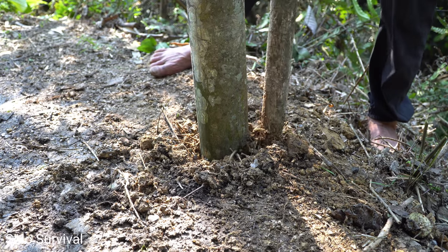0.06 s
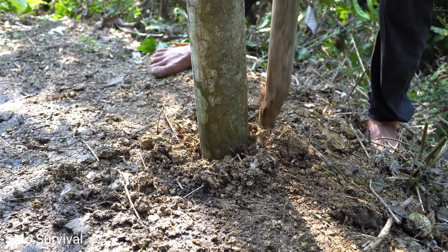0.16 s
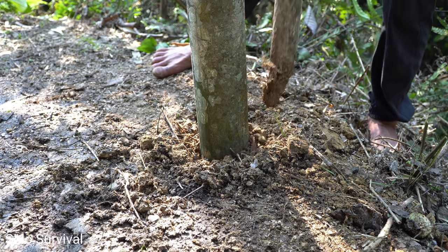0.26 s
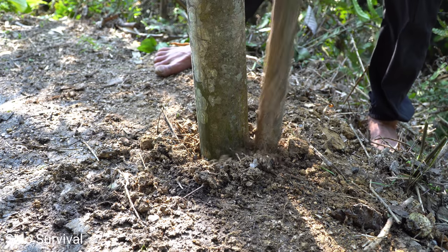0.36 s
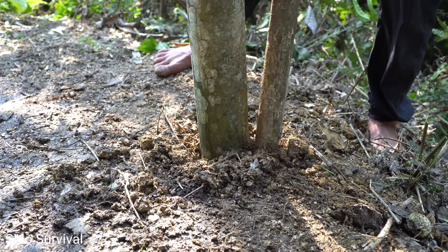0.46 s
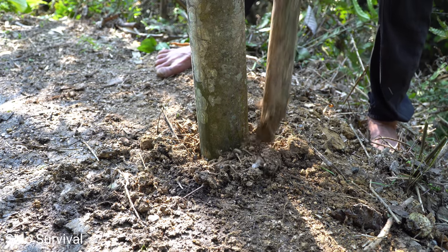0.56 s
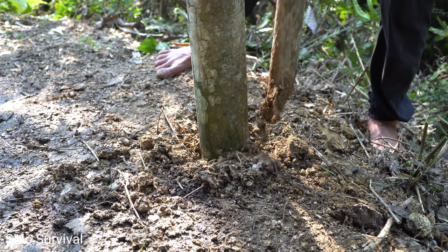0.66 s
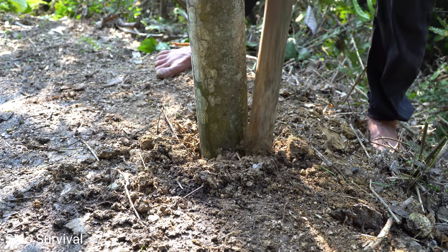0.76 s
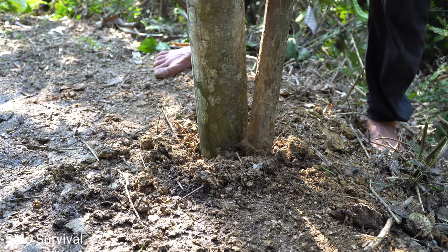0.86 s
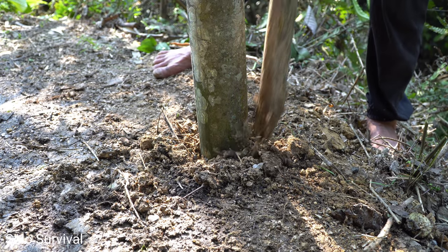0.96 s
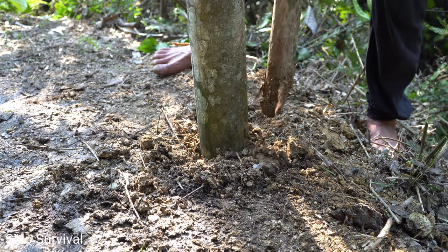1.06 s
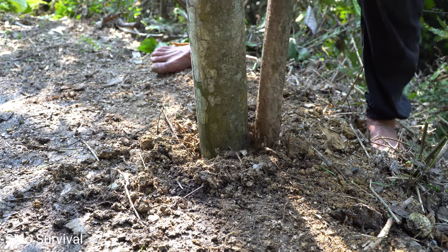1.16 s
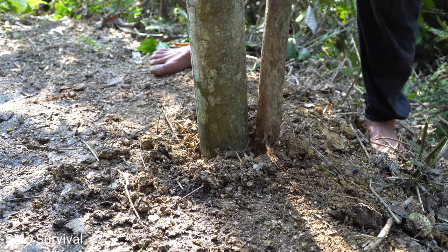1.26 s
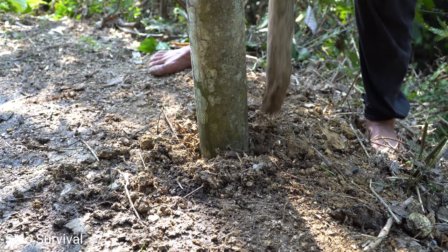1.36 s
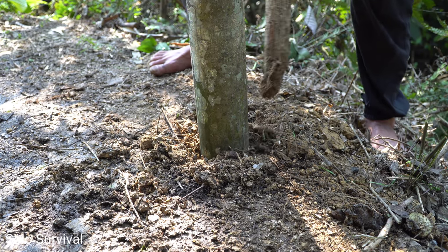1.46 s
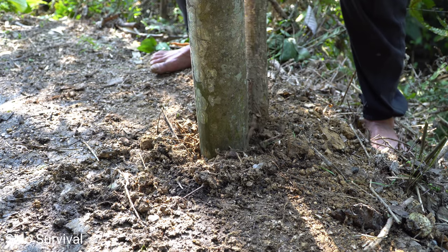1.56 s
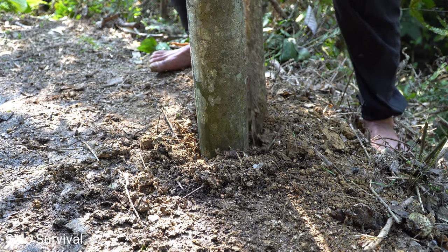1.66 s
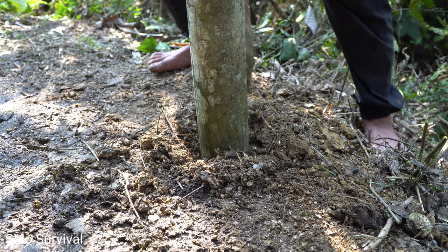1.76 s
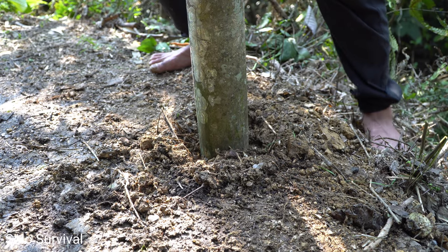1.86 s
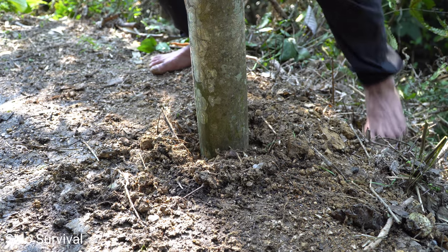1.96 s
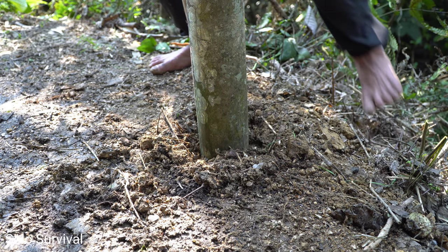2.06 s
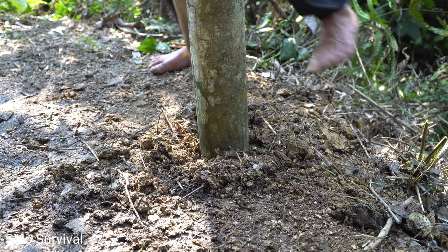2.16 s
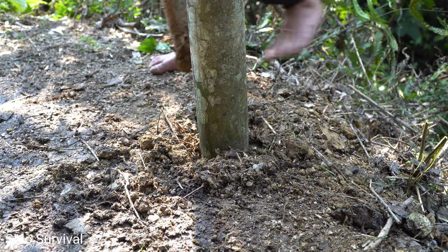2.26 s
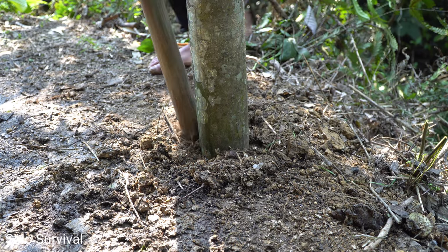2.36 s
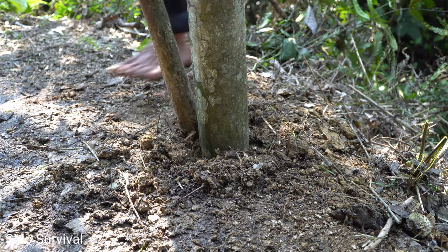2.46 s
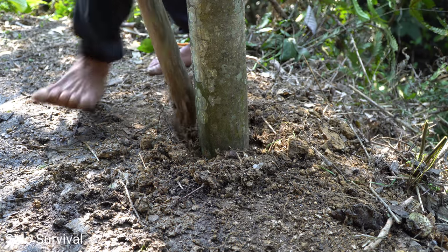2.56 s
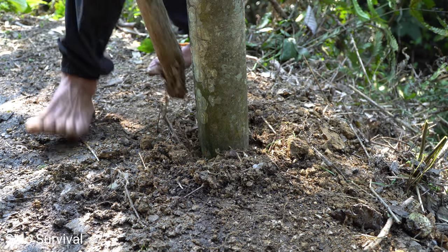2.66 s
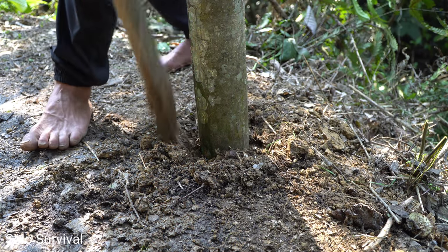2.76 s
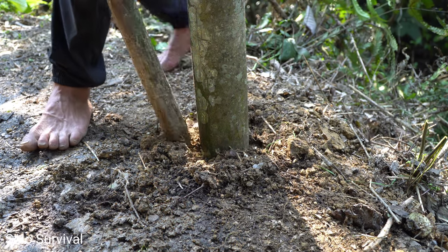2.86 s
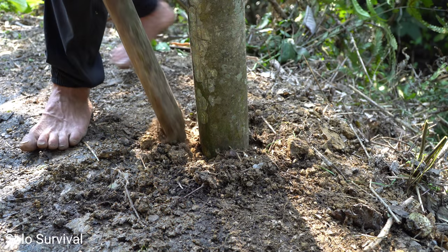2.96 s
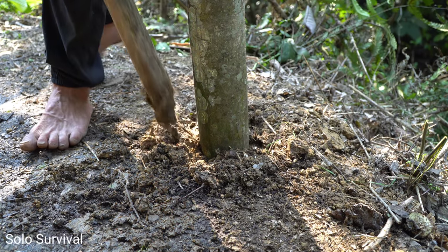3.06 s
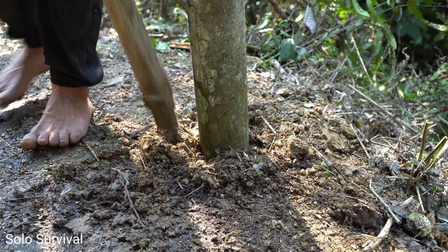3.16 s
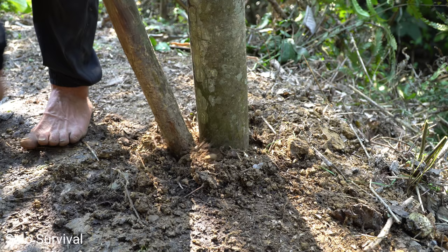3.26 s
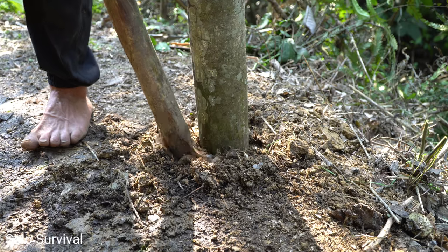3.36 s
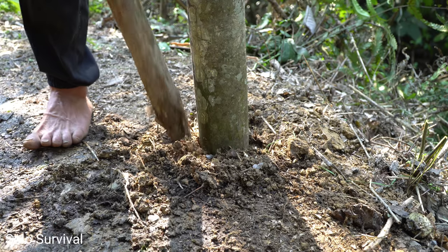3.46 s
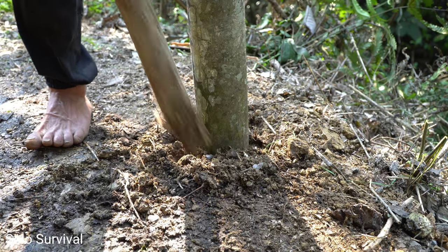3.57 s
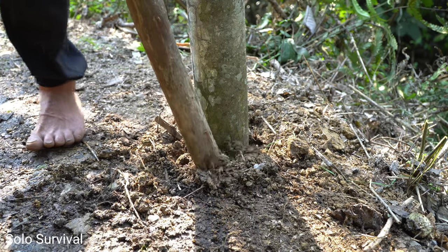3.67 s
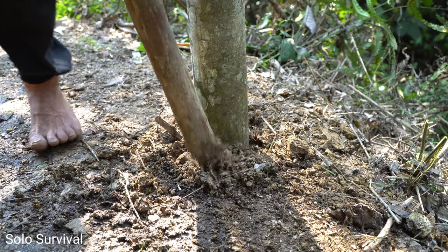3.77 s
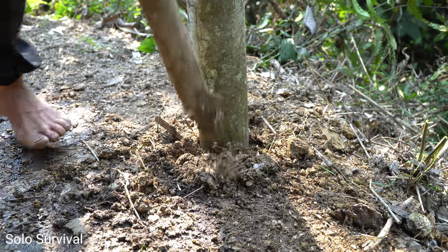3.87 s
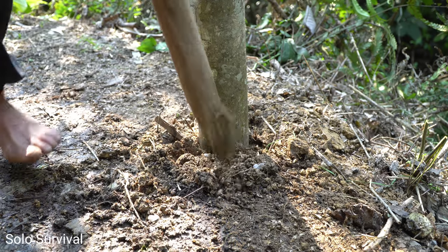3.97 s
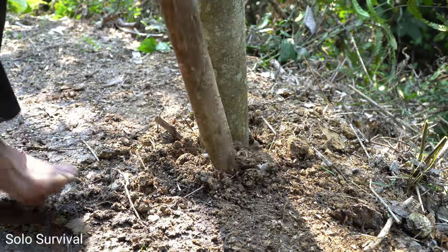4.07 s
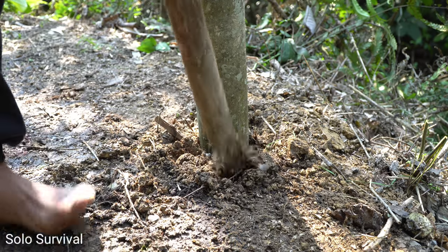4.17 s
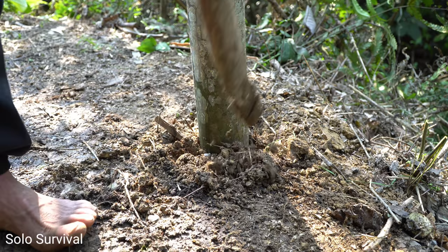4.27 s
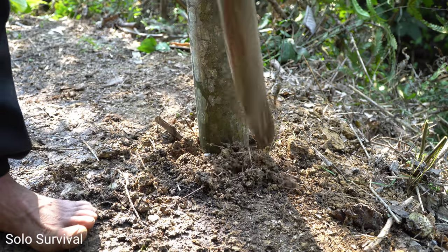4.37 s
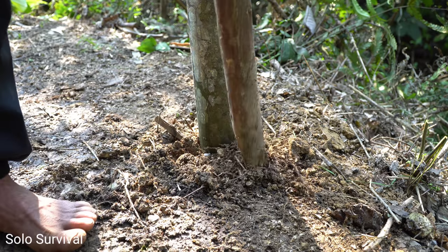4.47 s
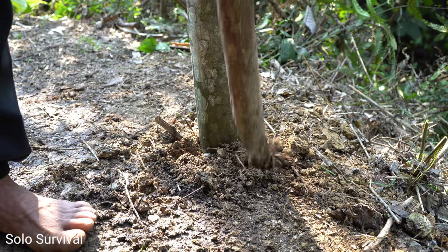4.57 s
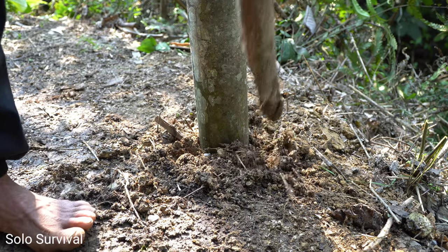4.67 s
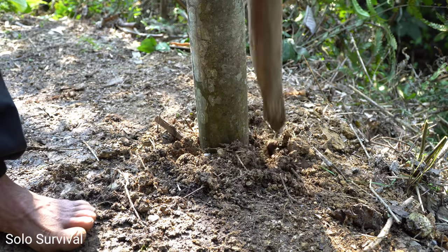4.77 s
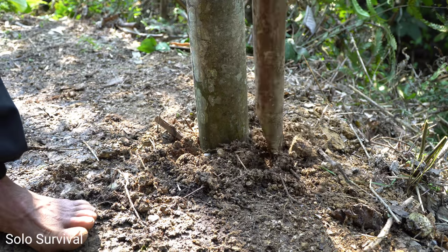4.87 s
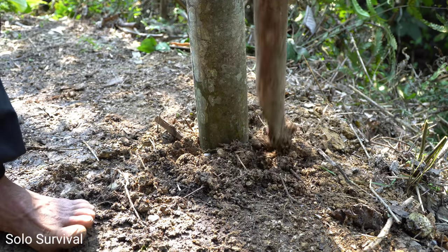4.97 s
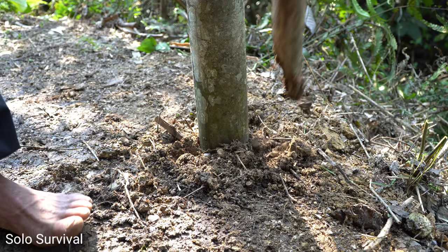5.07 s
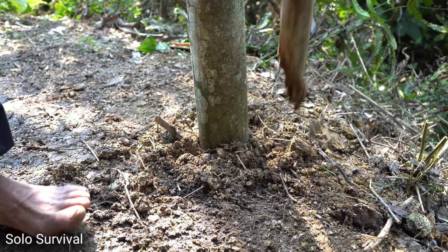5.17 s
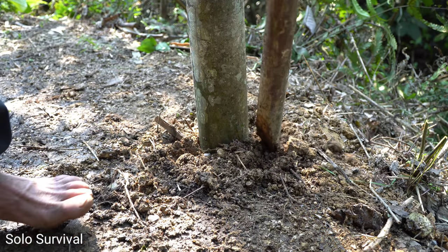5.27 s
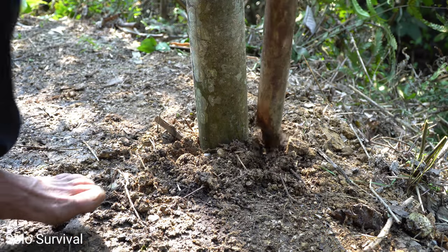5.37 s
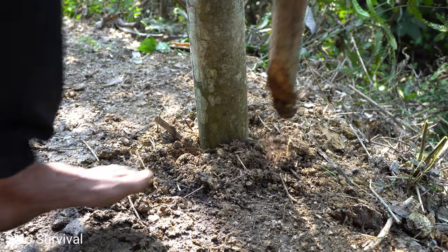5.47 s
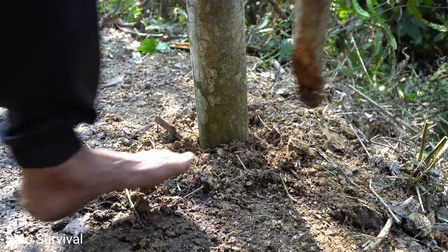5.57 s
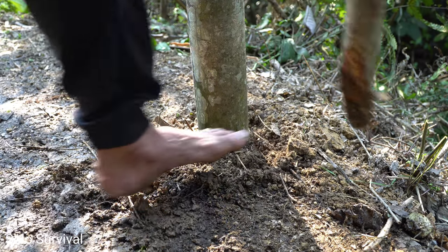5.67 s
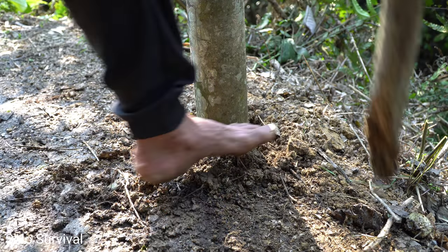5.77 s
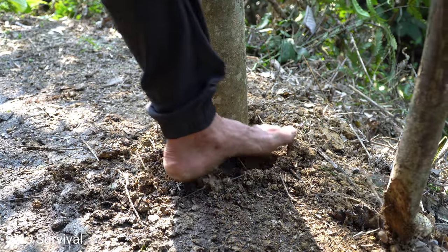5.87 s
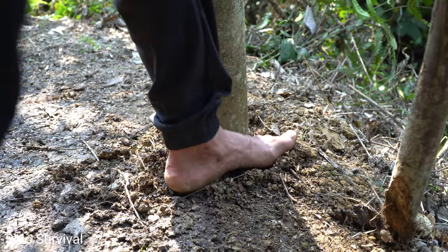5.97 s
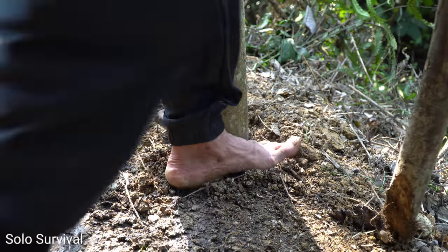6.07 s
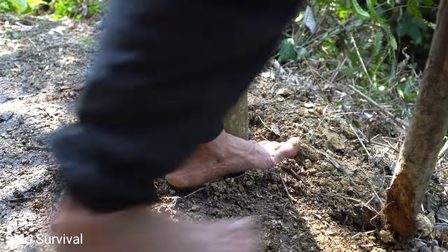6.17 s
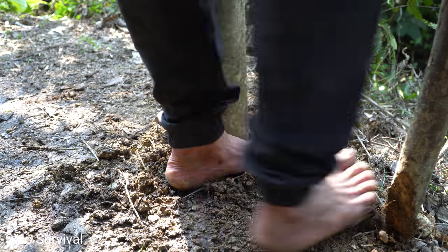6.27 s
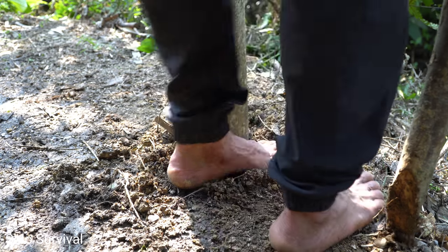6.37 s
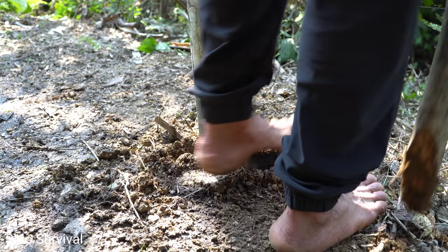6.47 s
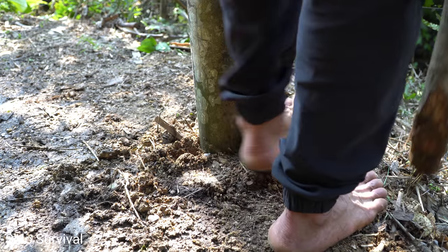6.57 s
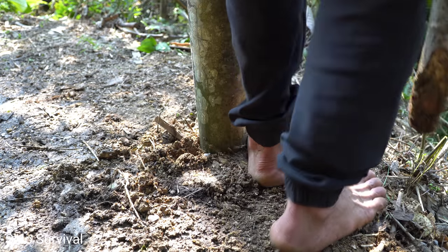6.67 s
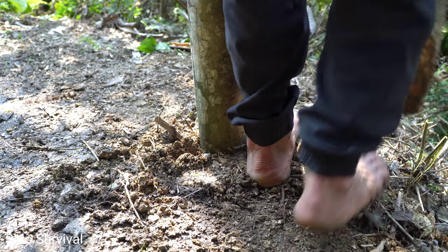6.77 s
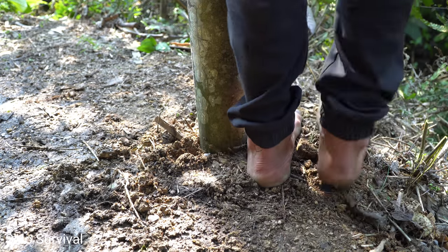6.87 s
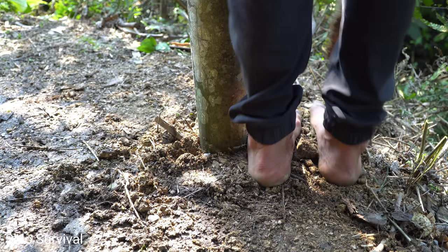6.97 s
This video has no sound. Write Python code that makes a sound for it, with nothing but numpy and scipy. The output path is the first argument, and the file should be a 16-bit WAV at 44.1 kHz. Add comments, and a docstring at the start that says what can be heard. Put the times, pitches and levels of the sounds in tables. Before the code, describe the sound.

Close stereo microphone near the ground: dry, gritty strokes of a stick packing soil. The first strokes gradually weaken, a hollow one follows a shifting foot, then brighter, harder crunches continue steadily until the last firm blow. A faint tap, loose earth scuffs and small snaps follow as bare feet step around. Soft forest air, quiet high bird chirps and a slight echo from the trees lie behind.

```python
"""Ramming soil around a post in a forest

A wooden stick rams loose soil, about two and a half blows a second: crushed grains ring its modes,
packed soil sounds hollow, sand hisses, crumbs patter and the ground bounces as the stick stops.
Bare feet scuff the earth and stir litter, as filtered random grains; pebbles and twigs click as short
resonances. A thin far bird call slurs upward, noise makes the forest air, and the trees echo softly."""
import sys
import numpy as np
from scipy import signal
from scipy.fft import rfft, irfft, next_fast_len
from scipy.io import wavfile

SR = 44100
rng = np.random.default_rng(int(sys.argv[2]) if len(sys.argv) > 2 else 0)


def to_wav(s):
    """Save 16-bit WAV."""
    ch = np.atleast_2d(s).T  # columns
    pcm = np.round(np.clip(ch, -1, 1) * 32767)  # PCM
    wavfile.write(sys.argv[1], SR, pcm.astype(np.int16))


N = 310023  # samples


def undb(db):
    """Decibels to gain."""
    return 10 ** (np.asarray(db) / 20)


def unit(x):
    """Scale to rms 1."""
    return x / np.sqrt(np.mean(x ** 2) + 1e-20)


def colour(x, points):
    """Causal minimum-phase filter with the given (Hz, dB) outline."""
    hz, db = np.transpose(points)
    f = np.fft.rfftfreq(2048, 1 / SR) + 1  # +1 keeps the log finite
    cepstrum = irfft(np.log(undb(np.interp(np.log(f), np.log(hz), db))))
    # fold onto positive time
    cepstrum[1:len(f) - 1] *= 2
    cepstrum[len(f):] = 0
    impulse = irfft(np.exp(rfft(cepstrum)))
    return signal.fftconvolve(x, impulse[None], axes=1)[:, :x.shape[1]]


def resonate(x, hz, width_hz):
    """One resonance, gain 1 at its centre."""
    return signal.lfilter(*signal.iirpeak(hz, hz / width_hz, fs=SR), x)


def pair(n, apart):
    """Noise in two channels: a shared part and a part of opposite sign."""
    mid, side = rng.standard_normal((2, n))
    return np.array([mid + apart * side, mid - apart * side])


def grains(n, per_s, spread_db, apart):
    """Random clicks, many small and a few large, each with its own balance."""
    hit = rng.random(n) < per_s / SR
    size = hit * undb(spread_db * np.minimum(rng.exponential(size=n), 4))
    balance = 1 + apart * rng.standard_normal(n) * np.array([[1], [-1]])
    return size * rng.choice([-1, 1], n) * balance


def wobble(n, per_s):
    """Random values, per_s of them a second, joined by straight lines."""
    steps = np.arange(n) / SR * per_s
    knots = np.arange(int(steps[-1]) + 2)
    return np.interp(steps, knots, rng.standard_normal(len(knots)))


def swell(rise_s, fall_s, attack_shape=1.9, release_shape=1.45):
    """Contact pressure that builds quickly and lets go; its peak comes three rise times in."""
    t = np.arange(-3 * rise_s, 4 * fall_s + .02, 1 / SR)
    attack = np.abs(t / rise_s) ** attack_shape
    release = np.abs(t / fall_s) ** release_shape
    return np.exp(-np.where(t < 0, attack, release))


def burst(x, press, db):
    """Scale a burst so that its rms at full pressure is db."""
    return unit(x) * np.sqrt(np.mean(press ** 2)) * undb(db)


def add(out, s, x, pan_db, lead_s_per_db=1.5e-5, lead_top_hz=4000):
    """Place a sound at time s; the nearer channel is louder and, below the treble, a little earlier."""
    side_db = np.array([[pan_db], [-pan_db]]) / 2
    margin = 64  # samples of room for the lead
    n = next_fast_len(x.shape[-1] + 2 * margin)
    f = np.fft.rfftfreq(n, 1 / SR)
    cycles = np.minimum(f, lead_top_hz) * side_db * lead_s_per_db - f * margin / SR
    x = irfft(rfft(x, n) * np.exp(2j * np.pi * cycles), n) * undb(side_db)
    i = int(s * SR) - margin
    a, b = max(i, 0), min(i + n, N)
    out[:, a:b] += x[:, a - i:b - i]


# Spectrum of the forest air. Each row: frequency in Hz, level in dB.
AIR_SPECTRUM = [(25, -5), (60, 1), (110, 1.5), (200, -1), (400, -4), (800, -7), (1600, -6.5), (2500, -7.5),
                (4000, -11.5), (7000, -16), (10000, -17), (15500, -21.5)]
FOREST_DB = -57  # rms before the sway


def forest(sway_db=.8):
    """Quiet air in the leaves as filtered noise, swelling slowly; the bass is alike in both channels."""
    side = colour(rng.standard_normal((1, N)), [(60, -22), (300, -10), (1500, -5), (6000, -2)])
    air = colour(rng.standard_normal((1, N)) + side * np.array([[1], [-1]]), AIR_SPECTRUM)
    sway = np.interp(np.arange(N), np.linspace(0, N, 20), rng.standard_normal(20))
    return unit(air) * undb(FOREST_DB + sway_db * sway)


# Spectrum scattered back by the trees. Each row: frequency in Hz, level in dB.
ECHO_SPECTRUM = [(100, -3), (400, 0), (800, -4), (1400, -1), (2200, -2), (4000, 0), (7000, -6),
                 (15000, -11)]


def echo(x, wet_db=-26, t60_s=.85, early_db=9, early_t60_s=.22, build_s=.012):
    """Trunks and leaves scatter the sound back: decaying noise, a strong early part and a longer tail."""
    t = np.arange(SR) / SR
    decay = undb(-60 * t / t60_s) + undb(early_db - 60 * t / early_t60_s)
    response = colour(pair(SR, .6) * decay * (1 - np.exp(-t / build_s)), ECHO_SPECTRUM)
    return signal.fftconvolve(x, unit(response) / np.sqrt(SR), axes=1)[:, :N] * undb(wet_db)


# Far bird calls. Each row: time in seconds, relative level in dB.
BIRD_CALLS = [(-.04, -59), (.6, -54), (1.24, -56), (2.37, -52), (3.52, -53), (4.39, -54), (4.95, -55),
              (6.44, -53)]


def bird(start_hz=4900, top_hz=6920, glide_s=.02, length_s=.065, t60_s=.75, direct_db=26, gain_db=2,
         trill_hz=650, trill_rate_hz=170):
    """A thin upward slur, buzzy at first and pure as it levels off, smeared by the trees."""
    out, t = np.zeros((2, N)), np.arange(SR // 2) / SR
    for s, db in BIRD_CALLS:
        slur = np.exp(-t / glide_s)
        trill = trill_hz * np.sqrt(slur) * np.sin(2 * np.pi * trill_rate_hz * t)
        hz = top_hz + (start_hz - top_hz) * slur + trill
        envelope = np.sqrt(np.abs(np.sin(np.pi * np.minimum(t / length_s, 1))))
        call = np.sin(2 * np.pi * np.cumsum(hz) / SR) * envelope
        trees = pair(len(t), .7) * undb(-60 * t / t60_s)
        trees[:, 0] += undb(direct_db)
        x = signal.fftconvolve(trees, call[None], axes=1)
        add(out, s - .01, x / np.abs(x).max() * 2 * undb(db + gain_db), 0)
    return out


# Dry litter stirring as the worker shifts weight. Each row: time in seconds, level in dB.
LITTER_LEVEL = [(0, -63), (1.55, -66), (1.98, -53), (2.3, -67), (2.65, -59), (3.5, -56), (3.85, -57),
                (4.02, -68), (4.38, -56), (4.78, -66), (5.1, -57), (5.6, -58), (5.85, -65), (6.1, -53),
                (6.3, -50), (6.42, -56), (7.03, -57)]


def litter(per_s=3500, spread_db=3.1, flicker_db=2, flicker_per_s=25):
    """Leaves and crumbs crackle faintly and unevenly under the feet, as filtered grains."""
    t = np.arange(N) / SR
    crackle = colour(grains(N, per_s, spread_db, apart=.45),
                     [(80, -5), (400, -4), (1000, -2), (2200, 0), (4500, -6), (9000, -11), (15000, -19)])
    level_db = np.interp(t, *np.transpose(LITTER_LEVEL))
    return unit(crackle) * undb(level_db + flicker_db * wobble(N, flicker_per_s))


# Pebbles struck and twigs snapping.
# Each row: time in seconds, peak in dB, ring in Hz, left minus right in dB.
SNAPS = [(.0792, -9, 4300, -2), (4.512, -22, 2600, 0), (4.921, -19, 2800, -.5), (5.0135, -28, 12000, 2),
         (5.9712, -14, 3200, -4), (6.2248, -14.5, 4880, 3.5), (6.502, -29, 4900, -3),
         (6.8984, -13, 4850, -4.5)]


def clicks(ring_q=12, crack_db=-15, crack_width_hz=5000, body_hz=1700, body_db=-22, second_s=.0034,
           second_db=-8):
    """A sharp crack with a brief ring, and a weaker second one as the piece gives."""
    out = np.zeros((2, N))
    for s, db, hz, pan_db in SNAPS:
        push = np.zeros(SR // 40)
        push[0], push[int(second_s * SR)] = 1, undb(second_db)
        ring = resonate(push, hz, hz / ring_q)
        crack = undb(crack_db) * resonate(push, hz, crack_width_hz)
        body = undb(body_db) * resonate(push, body_hz, 2 * body_hz)
        x = ring + crack + body
        add(out, s, x / np.abs(x).max() * undb(db), pan_db)
    return out


# Feet and stick scuffing loose earth.
# Each row: peak time in seconds, rise in seconds, rustle in dB, grit in dB, left minus right in dB.
EARTH_SCUFFS = [(1.853, .032, -45, -47, 0), (1.99, .07, -53, -49, 0), (2.592, .018, -41.5, -57, 2),
                (2.645, .012, -50, -55, 2), (2.782, .008, -56, -54, 2), (3.05, .04, -50, -59, 2),
                (3.604, .004, -45, -39, 3), (3.665, .01, -54, -51, 3), (4.29, .004, -62, -49, 1),
                (4.32, .015, -44, -40, 1), (4.401, .003, -47, -40, 1), (5.02, .02, -54, -53, 0),
                (5.412, .015, -51, -50, 0), (5.55, .04, -52, -50, 0), (6.172, .055, -43, -41, 1),
                (6.455, .025, -48, -54, -2), (6.505, .005, -42, -42, -3), (6.805, .045, -46, -51, -2)]
# Spectrum of crumbs and litter sliding. Each row: frequency in Hz, level in dB.
RUSTLE_SPECTRUM = [(60, -6), (200, -4), (400, -7), (900, -4), (1600, 0), (2600, -1), (4200, -6),
                   (8000, -22)]
SCUFF_FALL_S, SCUFF_FALL_PER_RISE = .017, .6  # a slow scuff also dies away slowly


def scuffs(per_s=3500, spread_db=3.4, slip_db=2.5, slip_per_s=70):
    """Crumbs and dry litter slide under soles and stick, catching and slipping as they go."""
    out = np.zeros((2, N))
    for s, rise_s, rustle_db, grit_db, pan_db in EARTH_SCUFFS:
        press = swell(rise_s, SCUFF_FALL_S + SCUFF_FALL_PER_RISE * rise_s, release_shape=1.2)
        slide = press * undb(slip_db * wobble(len(press), slip_per_s))
        rustle = colour(slide * grains(len(press), per_s, spread_db, apart=.25), RUSTLE_SPECTRUM)
        sand = colour(slide * grains(len(press), per_s, spread_db, apart=.45),
                      [(2000, -18), (4500, -1), (9000, 0), (12000, -3), (16000, -6)])
        x = burst(rustle, press, rustle_db) + burst(sand, press, grit_db)
        add(out, s - 3 * rise_s, x, pan_db)
    return out


# The stick works its way round the post.
# Each row: time in seconds, left minus right in dB, bounce of the ground there in Hz.
POST_PATH = [(0, -1.8, 73), (1.3, -1.5, 72), (1.7, -1, 100), (2.05, -.5, 113), (2.9, 1.5, 117),
             (3.7, 2.2, 116), (5.35, -.8, 97), (6, -4, 86)]


def place(s):
    """Left-right balance and ground pitch where the stick works at time s."""
    times, pan_db, ground_hz = np.transpose(POST_PATH)
    return np.interp(s, times, pan_db), np.interp(s, times, ground_hz)


FIRM_DB = -20  # force of an ordinary blow


def crumbs(per_s=2000, spread_db=3.4, rise_s=.012, fall_s=.07, lag_s=.015, level_db=-51.5, per_db=.5):
    """Crumbs thrown up by each blow patter back down, louder after a hard one."""
    out, press = np.zeros((2, N)), swell(rise_s, fall_s)
    for s, _, after, _, force_db, *_ in RAM_BLOWS:
        patter = colour(press * grains(len(press), per_s, spread_db, apart=.4),
                        [(400, -12), (2200, 0), (4500, -1), (8000, -8), (15000, -14)])
        x = burst(patter, press, level_db + per_db * (force_db - FIRM_DB))
        add(out, s + after + lag_s - 3 * rise_s, x, place(s)[0])
    return out


def thumps(t60_s=.07, onset_s=.0015, gain_db=3.6, rumble_db=-33.3, rumble_per_db=.45, rumble_t60_s=.62,
           rumble_hz=76, rumble_width_hz=78, lag_s=.002, bite_db=-3):
    """The ground gives at the bite, bounces a few cycles as the stick stops, then a low rumble dies away."""
    out, t = np.zeros((2, N)), np.arange(SR // 2) / SR
    onset = 1 - np.exp(-t / onset_s)
    for s, _, after, bite, *_, db in RAM_BLOWS:
        bounce = -np.sin(2 * np.pi * place(s)[1] * t) * undb(db - 60 * t / t60_s)
        rumble = resonate(rng.standard_normal(len(t)), rumble_hz, rumble_width_hz)
        rumble = unit(resonate(rumble, rumble_hz, rumble_width_hz))
        rumble = rumble * undb(rumble_db + rumble_per_db * db - 60 * t / rumble_t60_s)
        add(out, s - bite, bounce * undb(bite_db) * onset, 0)
        add(out, s + after + lag_s, (bounce * undb(gain_db) + rumble) * onset, 0)
    return out


# Modes of the hand-held stick. Each row: frequency in Hz, width in Hz, level in dB.
STICK_MODES = [(576, 85, -2), (711, 90, -2), (1060, 140, -3), (1300, 140, -2), (1690, 120, -2),
               (1960, 150, -5), (2190, 170, -1), (2610, 130, 0), (2900, 160, -5), (3190, 120, -4),
               (3510, 200, -2), (4250, 180, -3), (4970, 200, -4)]


def stick(press, per_s=10000, spread_db=2.7, direct_db=-3, drift=.012):
    """Grains crushed under the stick's end ring its modes, which the grip shifts a little each time."""
    crush = press * grains(len(press), per_s, spread_db, apart=.14)
    shift = 1 + drift * rng.standard_normal(len(STICK_MODES))
    x = undb(direct_db) * crush
    for (hz, width_hz, db), k in zip(STICK_MODES, shift):
        x = x + undb(db) * resonate(crush, hz * k, width_hz)
    return x


ENTER_S, STOP_S = .0021, .003  # softness of entry and stop
SETTLE_S = .06  # margin before and after the ploughing
BITE_RISE, BITE_FALL = .8, 1.15  # in bite lengths


def contact(before, after, bite, plough_db):
    """Pressure of one blow: the stick enters, ploughs on evenly, bites hard for a moment and stops."""
    t = np.arange(-before - SETTLE_S, after + SETTLE_S, 1 / SR)
    entered = 1 / (1 + np.exp(-(t + before) / ENTER_S))
    moving = 1 / (1 + np.exp((t - after) / STOP_S))
    peak = np.exp(-(t / (bite * np.where(t < 0, BITE_RISE, BITE_FALL))) ** 2)
    return np.maximum(undb(plough_db) * entered * moving, peak)


# Spectra of crushed grains on wood, packed soil and sand. Each row: frequency in Hz, level in dB.
CRUNCH_SPECTRUM = [(700, -32), (1250, -9), (1700, 1.5), (2500, 0), (3300, -3.5), (4500, -8), (6000, -18),
                   (12000, -45)]
HOLLOW_SPECTRUM = [(250, -18), (410, -14), (530, -2.5), (720, 0), (1050, 0), (1350, -2.5), (2000, -19),
                   (5000, -45)]
GRIT_SPECTRUM = [(2000, -25), (3500, -6), (4900, 0), (6700, -4.5), (9000, -3), (12000, -10), (16000, -14)]
# Blows of the stick. Each row: time of hardest bite in seconds, ploughing before it in seconds,
# ploughing after it in seconds, bite length in seconds, force in dB, wood ring in Hz,
# hollow tone relative to force in dB, hollow ring in Hz, knock in Hz, relative ground thump in dB.
RAM_BLOWS = [ (.087, .0065, .014, .010, -16.3, 2180, -7, 590, 270, -32),
             (.490, .013, .014, .011, -20.8, 1950, -9.5, 540, 220, -30),
             (.889, .012, .011, .008, -22.5, 2020, -5.5, 970, 190, -31),
             (1.270, .009, .015, .009, -23.5, 1800, -5, 1070, 250, -34),
             (1.660, .022, .012, .012, -29, 1670, -6, 550, 140, -31),
             (2.047, .006, .018, .007, -20.8, 1700, 2.2, 600, 160, -31),
             (2.498, .019, .012, .007, -20.3, 2100, -13, 1150, 200, -35),
             (2.917, .008, .031, .007, -17.8, 2170, -12, 1300, 265, -32),
             (3.354, .030, .010, .013, -16, 2200, -10.5, 1100, 180, -27),
             (3.742, .009, .025, .007, -14.5, 2280, -14.5, 1070, 200, -39),
             (4.133, .008, .026, .008, -17, 2100, -15, 1200, 185, -33),
             (4.532, .009, .015, .010, -16, 2630, -10, 1010, 120, -39),
             (4.938, .011, .014, .013, -17, 2150, -9, 1150, 230, -36),
             (5.364, .012, .008, .008, -18, 2290, -11, 660, 140, -28),
             (5.987, .015, .010, .010, -30, 2160, -5, 1380, 150, -36)]
GRIT_DB, GRIT_PER_DB = -31.1, .28  # sand at an ordinary blow, growth with force
GRIT_PER_HOLLOW_DB = .25  # packed soil sounds hollow and sheds less sand
KNOCK_DB, KNOCK_PER_DB = -36.8, .7  # low knock, likewise


def blows(ring_db=-1, ring_width_hz=450, hollow_ring_db=2, hollow_width_hz=200, knock_width_hz=130,
          sand_power=.56, wood_plough_db=-10, soil_plough_db=-6, sand_plough_db=-5.5, jolt_db=1.1,
          jolt_per_s=250):
    """Each blow: a woody crunch, a hollow tone of packing soil, sand hissing at the rim and a low knock."""
    out = np.zeros((2, N))
    plough_dbs = (wood_plough_db, soil_plough_db, sand_plough_db)
    for s, before, after, bite, force_db, ring_hz, hollow_db, hollow_hz, knock_hz, _ in RAM_BLOWS:
        press = np.array([contact(before, after, bite, db) for db in plough_dbs])
        # clods give way in small jolts
        on_wood, on_soil, on_sand = press * undb(jolt_db * wobble(press.shape[1], jolt_per_s))
        n = len(on_sand)
        wood, soil = stick(on_wood), stick(on_soil)
        # where the end lands decides which modes speak most
        crunch = colour(wood, CRUNCH_SPECTRUM) + undb(ring_db) * resonate(wood, ring_hz, ring_width_hz)
        soil_ring = undb(hollow_ring_db) * resonate(soil, hollow_hz, hollow_width_hz)
        hollow = colour(soil + soil_ring, HOLLOW_SPECTRUM)
        # loose sand moves at the lightest touch, so it starts first
        sand = on_sand ** np.where(np.arange(n) < press[0].argmax(), sand_power, 1)
        grit = colour(sand * grains(n, per_s=12000, spread_db=2.9, apart=.4), GRIT_SPECTRUM)
        knock = resonate(on_soil * pair(n, .05), knock_hz, knock_width_hz)
        knock = resonate(knock, knock_hz, 2 * knock_hz)
        extra_db = force_db - FIRM_DB
        grit_db = GRIT_DB + GRIT_PER_DB * extra_db - GRIT_PER_HOLLOW_DB * hollow_db
        x = burst(crunch, on_wood, force_db)
        x = x + burst(hollow, on_soil, force_db + hollow_db)
        x = x + burst(grit, on_sand, grit_db)
        x = x + burst(knock, on_soil, KNOCK_DB + KNOCK_PER_DB * extra_db)
        add(out, s - before - SETTLE_S, x, place(s)[0])
    return out


def scene():
    """The work at the post, its echo, the bird and the forest."""
    near = blows() + thumps() + crumbs() + scuffs() + litter() + clicks()
    return near + echo(near) + bird() + forest()


def record(dry, left_treble_db=1.2, top_hz=15700):
    """The left channel is a little brighter; a steep low-pass cuts the top."""
    left = colour(dry[:1], [(2500, 0), (4500, left_treble_db)])
    low_pass = signal.ellip(10, .2, 70, top_hz, fs=SR, output="sos")
    return signal.sosfilt(low_pass, np.vstack([left, dry[1:]]))


dry = scene()
out = record(dry)
to_wav(out)
```